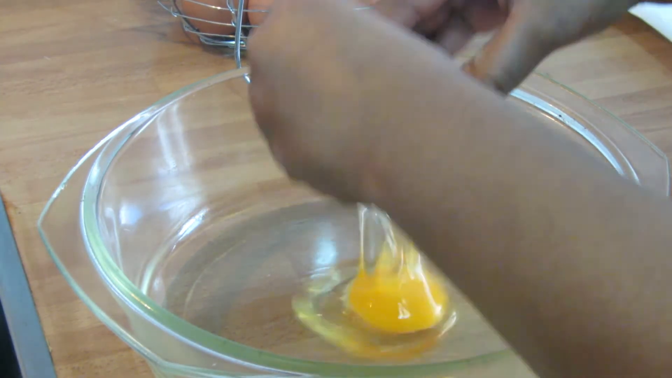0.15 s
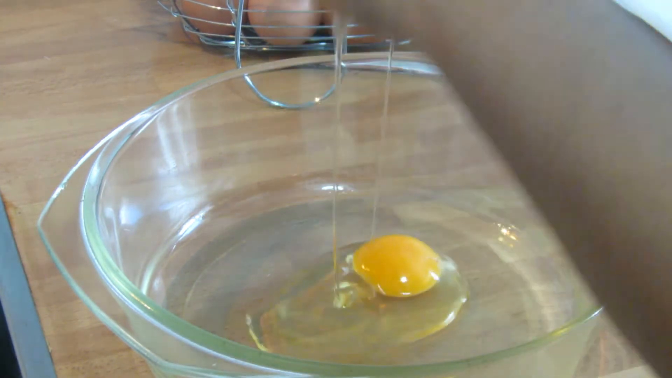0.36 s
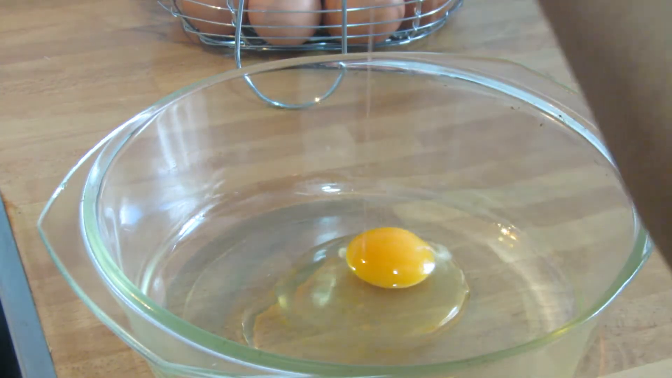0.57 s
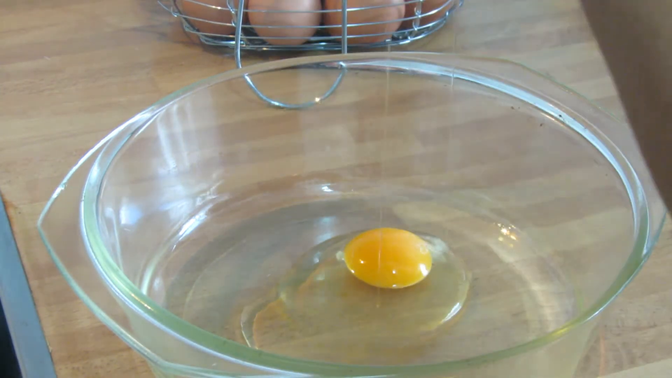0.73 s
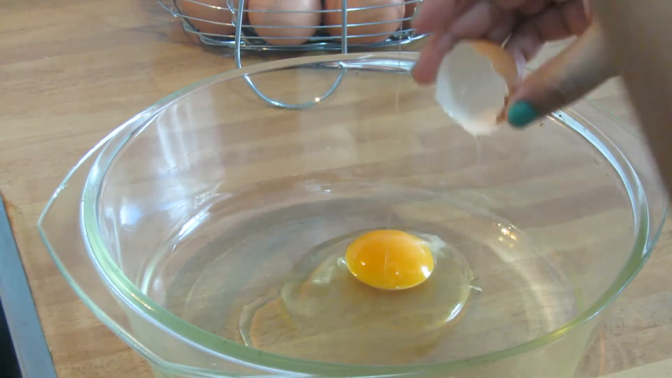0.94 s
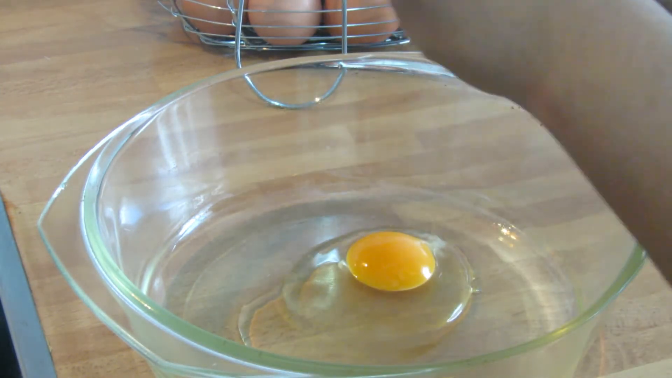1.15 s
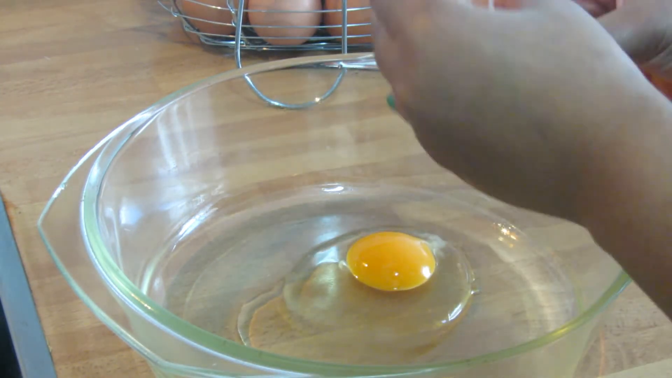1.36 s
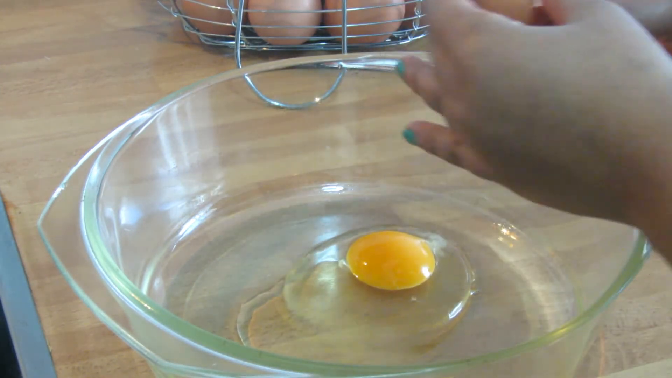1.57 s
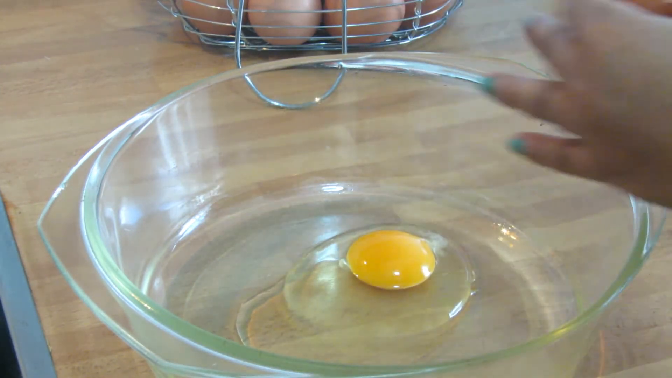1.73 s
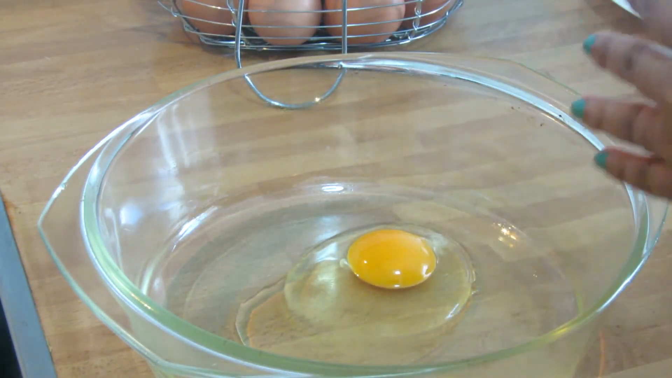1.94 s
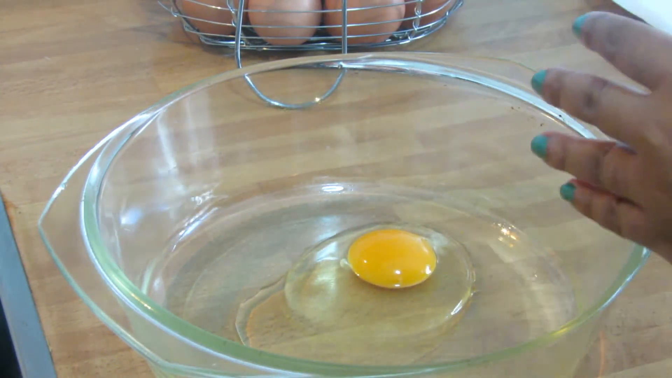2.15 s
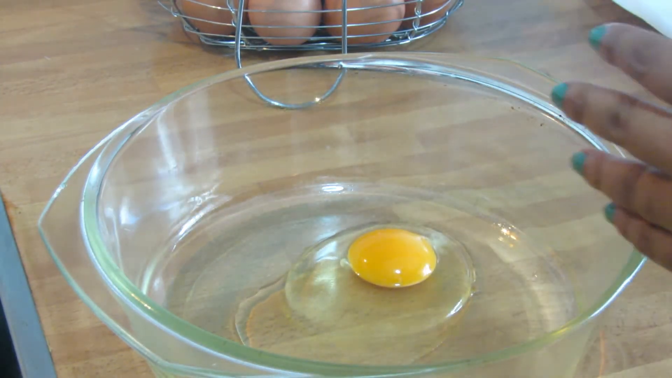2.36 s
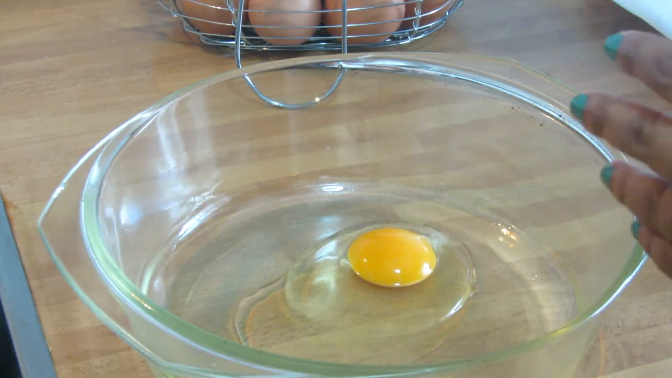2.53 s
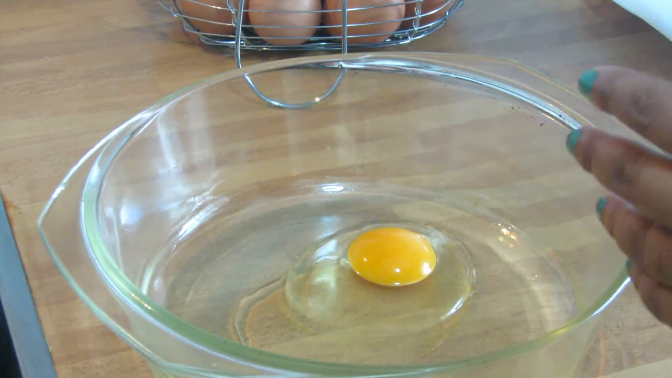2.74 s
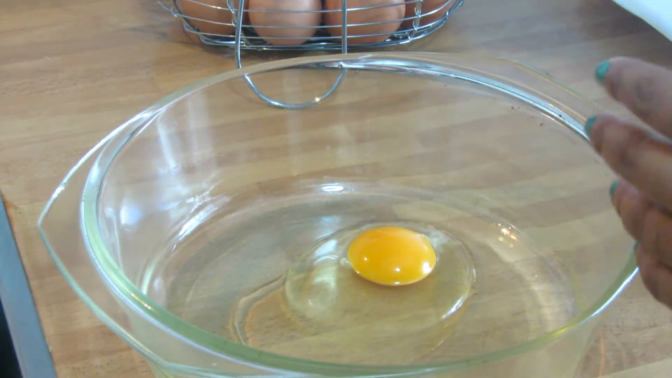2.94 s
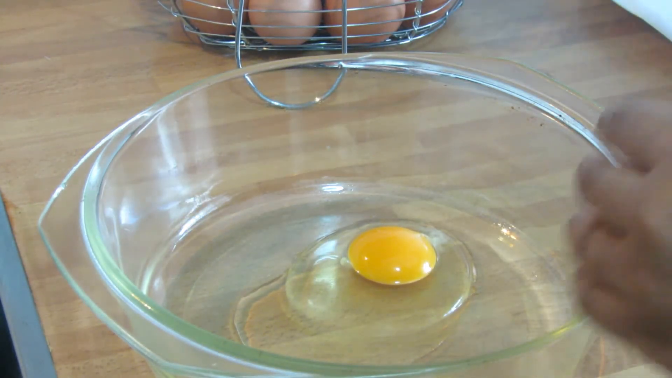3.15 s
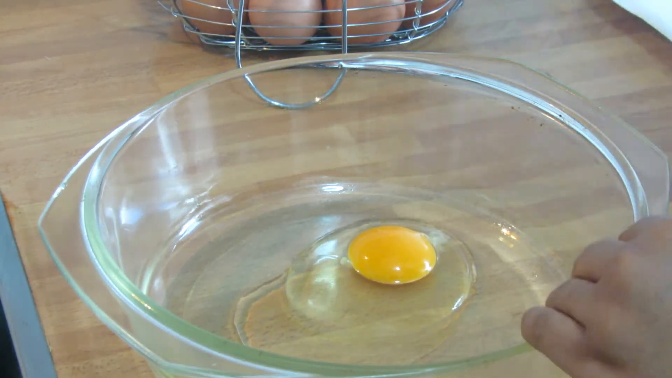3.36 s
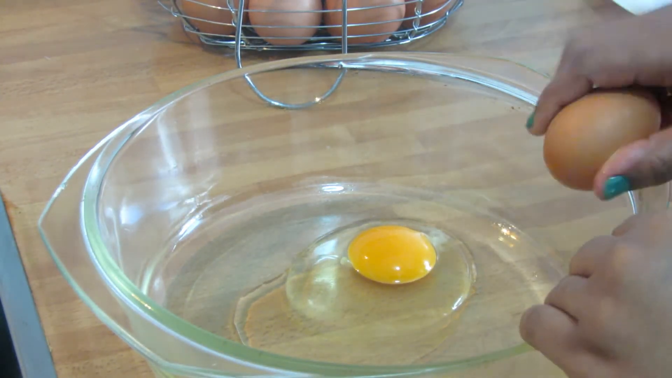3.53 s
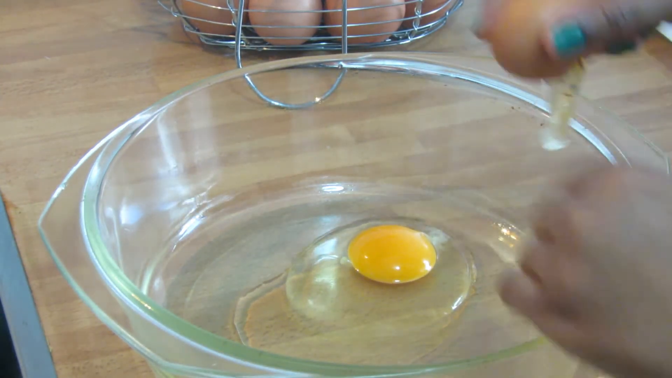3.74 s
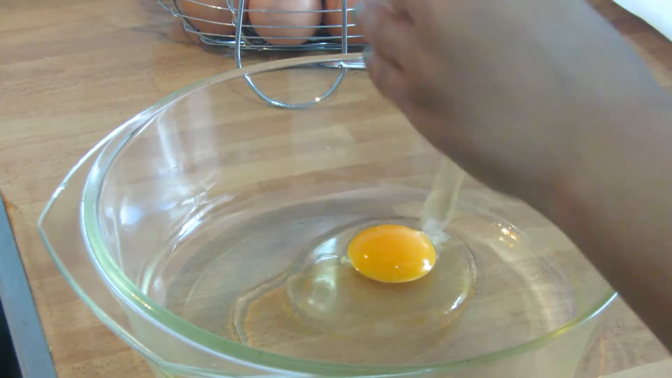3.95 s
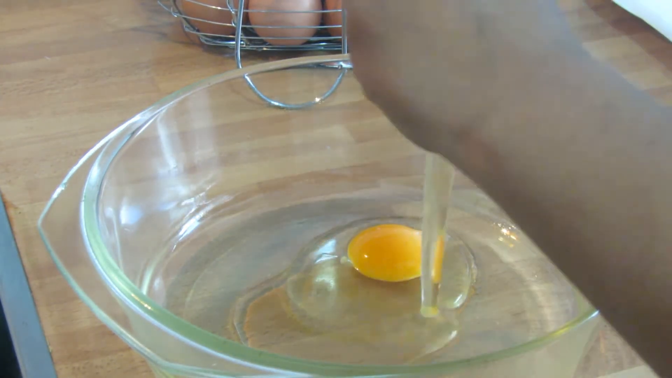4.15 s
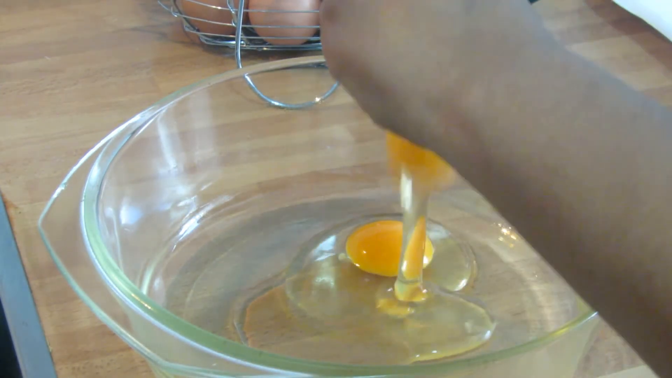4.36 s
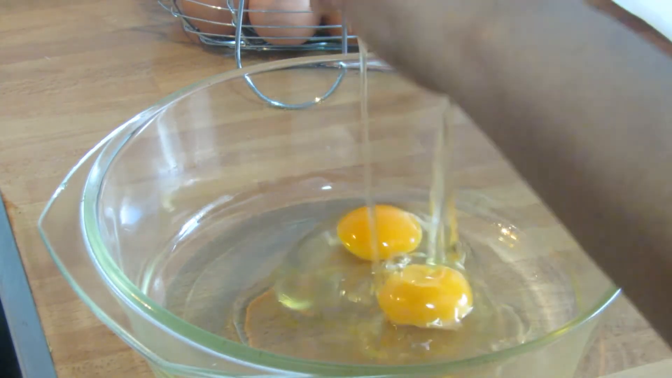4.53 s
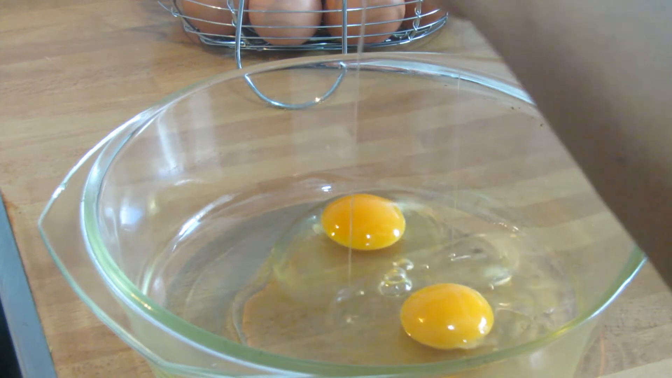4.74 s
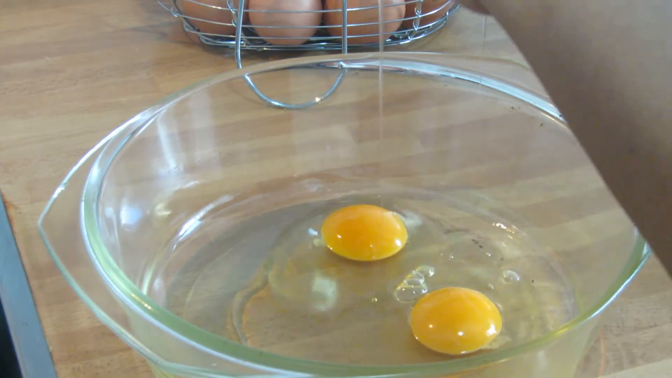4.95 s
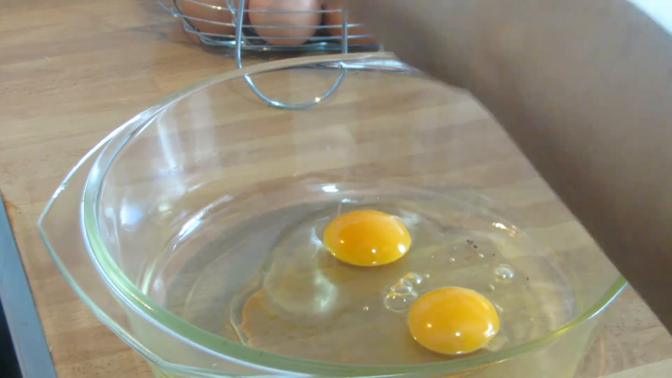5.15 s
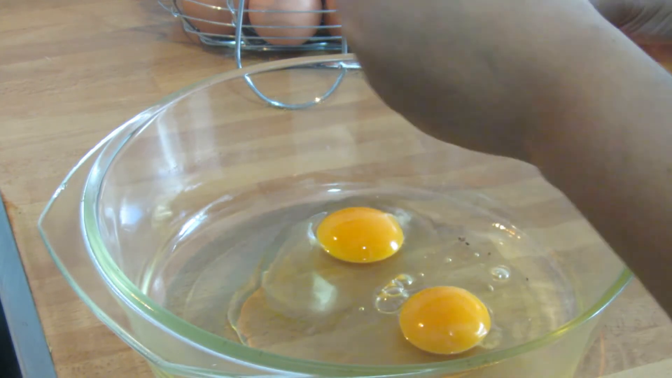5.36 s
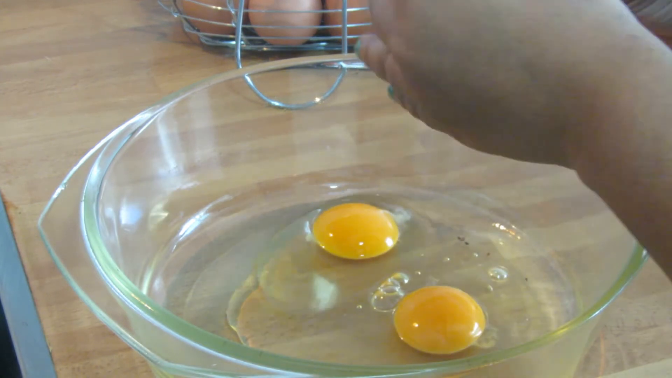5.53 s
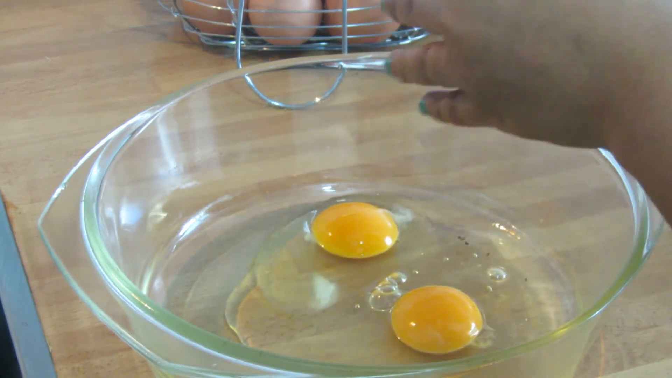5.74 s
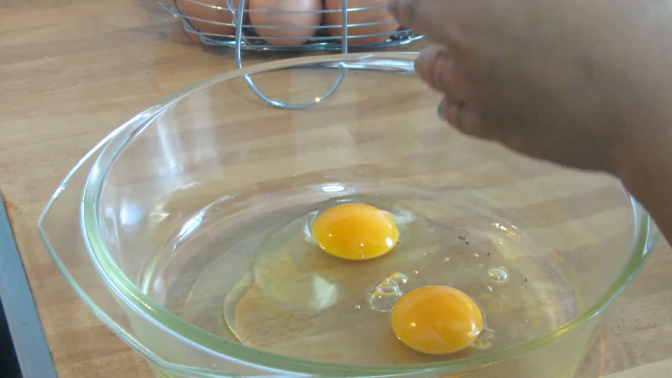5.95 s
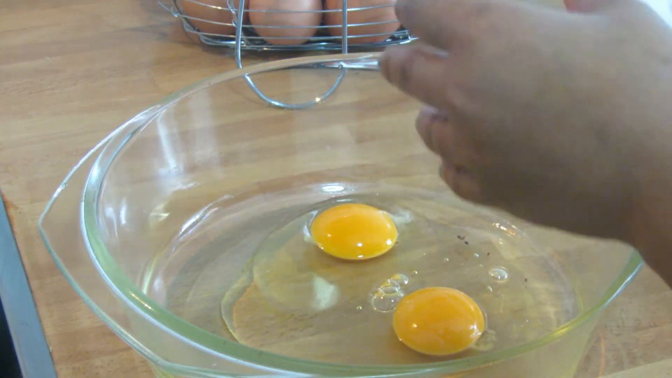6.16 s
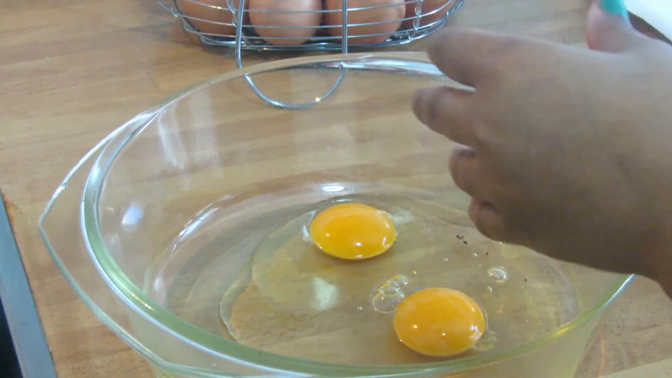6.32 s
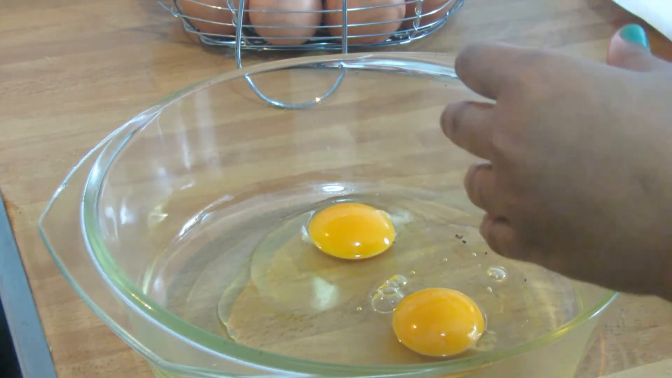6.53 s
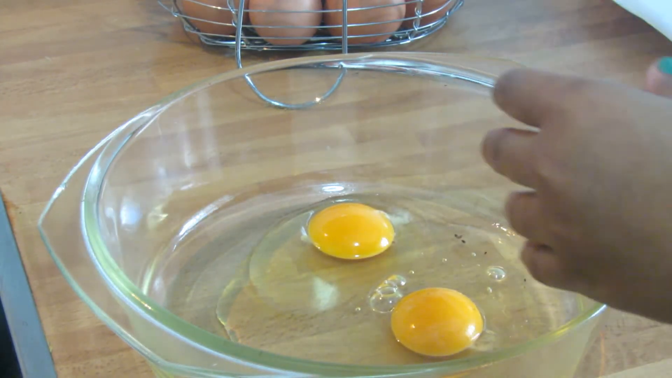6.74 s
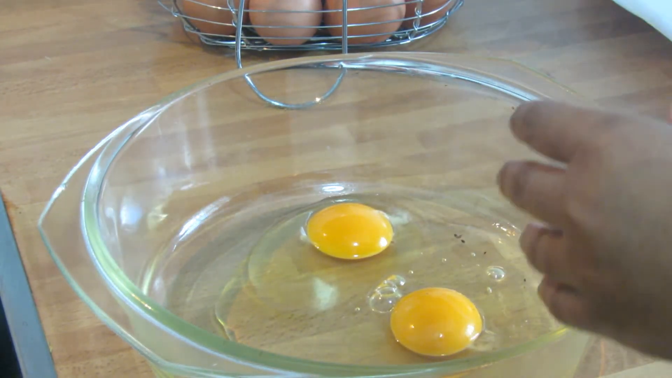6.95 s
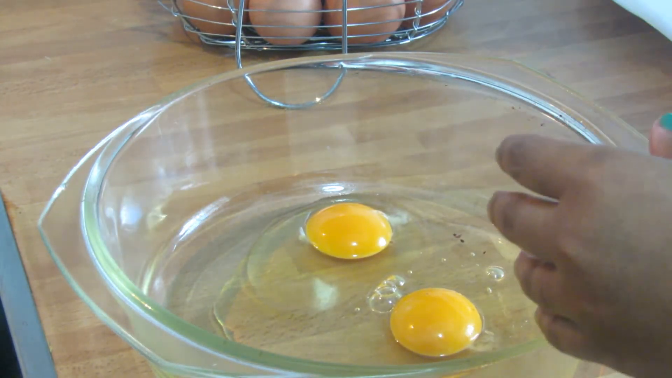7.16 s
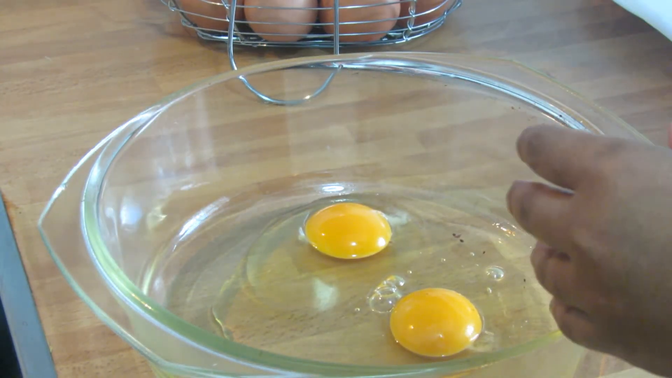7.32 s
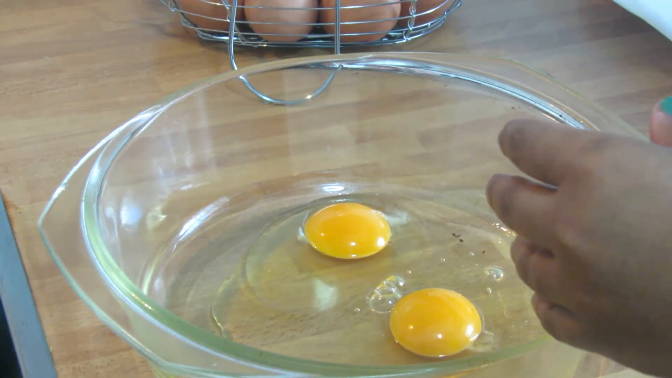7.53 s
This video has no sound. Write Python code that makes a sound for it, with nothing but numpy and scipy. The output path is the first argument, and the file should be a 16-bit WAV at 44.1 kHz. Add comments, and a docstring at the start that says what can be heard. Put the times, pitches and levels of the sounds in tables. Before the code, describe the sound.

In a small kitchen, faint eggshell ticks and a hand's brush lead to the hollow knock of an empty shell put down on wood. After a few soft bumps, an egg is struck loudly on the rim of a glass bowl, snaps open and plops in. The shell halves tick and scrape together and are put aside. The sounds are close and slightly to the right, over a low appliance hum.

```python
"""A small kitchen, where eggs are cracked over a glass bowl on a wooden worktop.
An empty shell is put down with a hollow knock; the next egg is picked up, struck on the rim, pulled
open and plops in. Its halves tick and scrape together and are put aside. Impacts excite damped modes
of shell, glass and wood; brittle fracture gives bursts of noise, and friction trains of tiny slips.
An appliance hums behind. The loud hits overload a gain control, which ducks and slowly recovers."""
import sys
import numpy as np
from scipy import signal
from scipy.fft import rfft, irfft, next_fast_len
from scipy.io import wavfile

SR = 44100
rng = np.random.default_rng(int(sys.argv[2]) if len(sys.argv) > 2 else 0)


def pcm_store(signal):
    """Save signal as 16-bit PCM."""
    levels = np.round(np.clip(np.atleast_2d(signal), -1, 1) * 32767)
    wavfile.write(sys.argv[1], SR, levels.astype(np.int16).T)


N = 334719
TIME = np.arange(N) / SR
AGE = TIME[:SR // 2]

# Levels in the tables are relative; each source adds its own gain.
# Modes of bowl, opening egg, empty shell and worktop. Each row: frequency in Hz, level in dB, T60 in s.
BOWL_MODES = [(108, -19.5, .12), (599, -5, 0.03), (700, -13, 0.056), (1323, -5, 0.089), (1295, -22, 0.34),
              (1343, -12, .15), (1403, -7, 0.12), (1690, -6.5, 0.0061), (2400, -1, 0.0054),
              (3450, -13, .16), (3576, -19, 0.16), (4866, -13, 0.092), (5830, -18, 0.16), (8200, -27, .1)]
OPENING_MODES = [(990, -6.5, 0.012), (1297, 0.5, 0.011), (5700, -2.5, 0.0071)]
EMPTY_SHELL_MODES = [(1274, -4, 0.0071), (1900, 3.5, 0.013), (1990, -11.5, 0.093), (2600, -6.5, 0.0036),
                     (5200, -33, .004)]
WORKTOP_MODES = [(98, -4, .11), (130, -6, 0.084), (188, -7.5, 0.088), (270, -3.5, .08), (399.4, 2.5, 0.096),
                 (459, 4, .07)]
# Shell fractures. Each row: start in seconds, level in dB.
FRACTURES = [(1.4113, -33), (1.5825, -29), (1.607, -31), (4.133, -28), (4.1628, -26), (4.1711, -21),
             (4.2592, -11), (4.3031, -14.5), (4.4443, -23.5), (4.5423, -26.5), (4.7118, -26), (4.732, -27),
             (4.842, -27), (4.8587, -26.5), (4.9617, -20.5), (4.9909, -13), (5.1394, -30), (5.8217, -33.5),
             (6.3684, -22), (6.508, -14.5), (7.261, -21.5), (7.361, -28.5)]
# Hollow rings of shell: halves knocking together, or the egg ringing as it snaps open.
# Each row: start in seconds, cup pitch in Hz, cup level in dB.
SHELL_RINGS = [(.003, 3030, -37.5), (1.2419, 2880, -38.5), (1.6065, 1796, -37), (4.2601, 1170, -31),
               (4.3038, 1260, -35), (5.508, 1910, -40.5), (5.573, 1850, -32.5), (5.6247, 1900, -31),
               (5.6485, 2520, -36), (6.3668, 2060, -23.5), (6.5877, 2520, -22), (6.652, 1780, -31)]
# Shell edges scraping. Each row: start in seconds, length in seconds, cup pitch in Hz, level in dB.
SCRAPES = [(0, 0.014, 1840, -32), (1.436, 0.036, 2200, -44), (1.464, 0.041, 2480, -35.5),
           (1.538, 0.22, 2220, -52), (4.08, 0.087, 2880, -47), (4.226, 0.049, 2600, -30),
           (4.45, 0.07, 3160, -43), (4.723, 0.026, 2870, -46), (4.982, 0.011, 3040, -35.5),
           (5.541, 0.05, 1960, -35.5), (5.604, 0.077, 2330, -36), (5.778, 0.052, 2000, -51),
           (6.313, 0.059, 1900, -42), (6.512, 0.058, 2400, -46.5)]
# Deep cups sound hollow, small pieces crackle. Each row: cup pitch in Hz, crackle over cup in dB.
CRACKLE_SHARE = [(1850, -12), (2350, -1), (3000, 2)]
# Hands and eggs meeting the worktop. Each row: start in seconds, thud in dB, tap in dB, slide in seconds.
CONTACTS = [(.484, -55.5, -42, 0.096), (1.152, -54, -41.5, 0.02), (1.237, -53, -40.5, 0.074),
            (1.9976, -52, -17.5, 0.0106), (2.62, -45, -40.5, 0.092), (2.698, -39.5, -37.5, 0.056),
            (2.843, -29, -29, 0.066), (2.938, -48.5, -39, .11), (3.231, -43, -41, 0.037),
            (6.325, -58, -36.5, 0.041), (6.367, -39.5, -28.5, 0.041), (6.53, -53, -36, 0.072),
            (7.246, -41.5, -35, 0.066), (7.325, -43, -36, 0.094), (7.431, -39, -38.5, 0.1)]
# Hand strokes. Each row: start in seconds, length in seconds, level in dB, lower edge in Hz.
HAND_STROKES = [(0.252, 0.09, -55.5, 900), (0.475, 0.063, -60, 1200), (0.912, 0.094, -47, 1900),
                (1.089, 0.046, -52, 1780), (1.751, 0.099, -28.5, 173.5), (3.181, 0.052, -40, 493),
                (6.151, 0.029, -54.5, 900), (7.05, .18, -54.5, 500)]
# Spectra of the noises. Each row: frequency in Hz, spectral density in dB.
CRACK_SPECTRUM = [(60, -23.5), (300, -11.5), (1000, -2), (2500, 2), (4000, -4.5), (6300, 3.5), (10000, -7),
                  (15000, -11.5)]
SNAP_SPECTRUM = [(200, -19.5), (1000, -15), (2500, -7), (4200, -6.5), (6300, -0.5), (10500, -3.5),
                 (15000, -12.5)]
SPLASH_SPECTRUM = [(80, -14), (300, -5), (450, 2.5), (750, -5.5), (1200, -10.5), (2000, -26), (6000, -38)]
CRACKLE_SPECTRUM = [(500, -10), (2000, -6.5), (4000, -5), (6300, 0.5), (10000, -4.5), (15000, -15)]
TAP_SPECTRUM = [(100, -30), (400, -14.5), (800, -2), (1200, -5.5), (2000, -9.5), (8000, -28.5)]
BRUSH_SPECTRUM = [(47, -41.5), (80, -10), (136, -8), (323, -2.5), (404, -5), (877, -3.5), (980, -4.5),
                  (1120, -1), (1280, -6), (1600, -4.5), (6030, -5), (16000, -21)]
RUMBLE_SPECTRUM = [(50, -27.5), (75, -16), (100, 7), (150, -5.5), (260, -7.5), (400, 0.5), (650, -4.5),
                   (2000, -36.5)]
RUSTLE_SPECTRUM = [(300, -4), (800, 9), (1700, 2.5), (3500, -8), (6000, -5), (10000, -13.5), (15000, -22.5)]
HUSH_SPECTRUM = [(25, -7), (92, -3.5), (125, -8), (200, -5.5), (310, -12), (500, -13), (1000, -17.5),
                 (1700, -21), (4000, -25), (7000, -28.5), (16000, -39.5)]
# Left-right likeness of the room's hush. Each row: frequency in Hz, correlation from -1 to 1.
HUSH_CORRELATION = [(60, -0.73), (290, -0.58), (1400, -0.17), (3100, 0.27), (15000, -0.25)]
# Reverberation of the kitchen. Each row: frequency in Hz, T60 in seconds.
KITCHEN_T60 = [(100, 0.38), (700, .36), (2000, 0.32), (5000, .33), (13000, 0.22)]


def blow(start_s, modes, ring_db, crack_db, crumble_s):
    """Impact excitation: the shell crumbles while the struck body rings in its modes."""
    out = np.zeros(N)
    add(out, start_s, from_db(ring_db) * ring(modes))
    add(out, start_s, from_db(crack_db) * burst(CRACK_SPECTRUM, crumble_s))
    return out


def shell_ticks(piece_hz=2600, scatter_octaves=0.23, crumb_gap_s=0.097, rebound_s=0.014):
    """Brittle fracture and resonance: breaks and crumbs crack; shell knocked or snapped open rings."""
    out = np.zeros(N)
    # Crumbs tick at random while the halves are held open.
    crumbs = [(5 + crumb_gap_s * (k + late), -35.5) for k, late in enumerate(rng.random(6))]
    for start_s, db in FRACTURES + crumbs:
        hz = piece_hz * 2 ** (scatter_octaves * rng.uniform(-1.3, 1))
        add(out, start_s, tick(hz, crack_db=db, cup_db=db - 20))
    for start_s, hz, db in SHELL_RINGS:
        add(out, start_s, tick(hz, crack_db=db - 3.5, cup_db=db))
        add(out, start_s + rebound_s, from_db(-9.5) * tick(hz, crack_db=db - 15.5, cup_db=db))
    return out


def tick(hz, crack_db, cup_db):
    """Impulse excitation: the bright snap of a thin edge also rings the hollow shell."""
    return from_db(cup_db + 21.5) * cup(hz) + from_db(crack_db + 15) * burst(SNAP_SPECTRUM, 0.0023)


def cup(hz, t60=0.0097):
    """Damped resonance of a half shell: one main mode with a weaker one on either side."""
    modes = [(0.756 * hz, -8, t60), (hz, 0, t60), (1.269 * hz, -6, t60)]
    return unit_energy(ring(modes, AGE[:2048]))


def plop(push_hz=203, swell_s=0.0046, yolk_s=4.786, gap_s=0.009, slowing=1.45):
    """Liquid impact: each lump of egg pushes the bowl with a low pulse and slaps the white in it."""
    out = np.zeros(N)
    push = AGE / swell_s * np.exp(1 - AGE / swell_s) * np.sin(2 * np.pi * push_hz * AGE)
    # The white lands first; the yolk wobbles in ever slower lumps, its splash dying before its push.
    white = (4.762, -27.5, -14)
    ages = np.cumsum(np.r_[0, gap_s * slowing ** np.arange(5)])
    yolk = [(yolk_s + age, -21.5 - 125 * age, 4 - 231 * age) for age in ages]
    for start_s, push_db, splash_db in [white] + yolk:
        add(out, start_s, from_db(push_db) * push)
        add(out, start_s, from_db(splash_db) * burst(SPLASH_SPECTRUM, decay_s=0.027, size=4096))
    return out


def scraping():
    """Stick-slip friction: broken edges grate on each other and excite the hollow of the shell."""
    out = np.zeros(N)
    for start_s, length_s, hz, db in SCRAPES:
        slips = friction(length_s, per_s=2000, spread_db=3.5)
        hollow = unit_energy(signal.fftconvolve(slips, cup(hz))[:len(slips)])
        crackle = from_db(at_hz(CRACKLE_SHARE, hz)) * unit_energy(coloured(slips, CRACKLE_SPECTRUM))
        add(out, start_s, at_level(hollow + crackle, db - 2, length_s))
    return out


def worktop_bumps(rock_s=0.021, loss_per_touch_db=4.5, rest_db=-34.5):
    """Inelastic impact: a soft contact taps and thuds on the wood; a heavy one rocks to rest."""
    out = np.zeros(N)
    for start_s, thud_db, tap_db, _ in CONTACTS:
        for touch in range(5):
            modes = [(hz, db + rng.normal(0, 1.6), t60) for hz, db, t60 in WORKTOP_MODES]
            thud = unit_energy(ring(modes))
            tap = burst(TAP_SPECTRUM, decay_s=0.0076)
            touch_s, loss_db = start_s + touch * rock_s, touch * loss_per_touch_db
            if touch == 0 or thud_db - loss_db > rest_db:
                add(out, touch_s, from_db(thud_db + 25 - loss_db) * thud)
                add(out, touch_s, from_db(tap_db + 21 - loss_db) * tap)
    return out


def handling(lead_s=0.02, trail_s=0.14):
    """Sliding friction: hands brush the worktop, and what they bump slides with a rumble and a rustle."""
    out = np.zeros(N)
    for start_s, length_s, db, edge_hz in HAND_STROKES:
        # The hand grazes lightly before each stroke and trails off after it.
        graze = (start_s - lead_s, lead_s + length_s + trail_s, db - 12.5)
        for onset_s, stroke_s, stroke_db in [(start_s, length_s, db), graze]:
            slips = friction(stroke_s, per_s=20000, spread_db=0.5, size=18000)
            hiss = low_cut(coloured(slips, BRUSH_SPECTRUM), edge_hz)
            add(out, onset_s, at_level(hiss, stroke_db, stroke_s))
    for start_s, thud_db, tap_db, slide_s in CONTACTS:
        slips = friction(slide_s, per_s=1800, spread_db=5.0)
        add(out, start_s, at_level(coloured(slips, RUMBLE_SPECTRUM), thud_db - 1.5, slide_s))
        add(out, start_s, at_level(coloured(slips, RUSTLE_SPECTRUM), tap_db - 6.5, slide_s))
    return from_db(-2) * out


def kitchen(x, tail_db=3.5, early_db=-4, early_s=0.0035, build_s=0.0038):
    """Reverberation: early reflections from bowl and worktop, then a diffuse tail dying by octave."""
    noise = stereo_noise([(100, 0.7), (1500, 0.37), (12000, 0.05)], size=len(AGE))
    octave = np.round(np.log2(np.maximum(np.fft.rfftfreq(len(AGE), 1 / SR), 100)))
    tail = np.zeros_like(noise)
    for k in np.unique(octave):
        band = irfft(rfft(noise) * (octave == k))
        tail += band * from_db(-60 * AGE / at_hz(KITCHEN_T60, 2 ** k))
    tail = unit_energy(tail * (1 - np.exp(-AGE / build_s)))
    early = unit_energy(noise * AGE * np.exp(-2 * AGE / early_s))
    response = from_db(tail_db) * tail + from_db(early_db) * early
    return signal.fftconvolve(x[None], response, axes=1)[:, :N]


def room_tone(hush_db=-47.5, hum_db=-61, hum_hz=197, hum_width_hz=14):
    """Ambient noise: a broadband hush and the wavering narrowband hum of an appliance."""
    noise = stereo_noise(HUSH_CORRELATION, size=next_fast_len(N))[:, :N]
    hush = unit_rms(coloured(noise, HUSH_SPECTRUM))
    resonance = signal.iirpeak(hum_hz, hum_hz / hum_width_hz, fs=SR)
    hum = unit_rms(signal.lfilter(*resonance, rng.standard_normal((2, N))))
    return from_db(hush_db) * hush + from_db(hum_db) * hum


def ring(modes, age=AGE):
    """Modal superposition: freely decaying sinusoids of alternating sign."""
    return sum((-1) ** k * from_db(db - 60 * age / t60) * np.sin(2 * np.pi * hz * age)
               for k, (hz, db, t60) in enumerate(modes))


def burst(spectrum, decay_s, snap=0.07, size=2048):
    """Transient noise: an impulse and an exponentially dying spray, of unit energy."""
    spray = unit_energy(rng.standard_normal(size) * np.exp(-AGE[:size] / decay_s))
    return unit_energy(coloured(spray + snap * (AGE[:size] == 0), spectrum))


def friction(length_s, per_s, spread_db, size=12288):
    """Shot noise: random slips of uneven size under a rounded swell of pressure."""
    pressure = np.abs(np.sin(np.pi * np.minimum(AGE[:size] / length_s, 1))) ** .5
    sizes = from_db(spread_db * np.minimum(rng.exponential(1, size), 4)) * rng.choice([-1, 1], size)
    return pressure * sizes * (rng.random(size) < per_s / SR)


def stereo_noise(correlation, size):
    """Partial coherence: mid and side noise mix to the given left-right correlation."""
    alike = at_hz(correlation, np.fft.rfftfreq(2 * size, 1 / SR))
    mid, side = rfft(rng.standard_normal((2, 2 * size)))
    return irfft(np.sqrt((1 + alike) / 2) * mid + np.sqrt((1 - alike) / 2) * side * [[1], [-1]])[:, :size]


def coloured(x, spectrum, size=2048):
    """Minimum-phase filtering: the folded cepstrum gives a causal response with this spectrum."""
    gain = from_db(at_hz(spectrum, np.fft.rfftfreq(size, 1 / SR)))
    cepstrum = irfft(np.log(gain))
    response = irfft(np.exp(rfft(2 * cepstrum[:size // 2], size) - cepstrum[0]))
    return signal.oaconvolve(x, np.array(response, ndmin=x.ndim), axes=-1)[..., :x.shape[-1]]


def low_cut(x, hz):
    """Third-order high-pass filtering."""
    return signal.sosfilt(signal.butter(3, hz, "high", fs=SR, output="sos"), x + 1e-18)


def placed(x, right_db):
    """A level difference between the channels leans a source to the right."""
    return x * from_db(np.array([[-right_db], [right_db]]) / 2)


def add(track, start_s, sound):
    """Superposition of a sound on a track."""
    start = max(round(start_s * SR), 0)
    track[start:start + len(sound)] += sound[:N - start]


def at_hz(points, hz):
    """Interpolation on a log-frequency axis."""
    known_hz, value = np.transpose(points)
    return np.interp(np.log(np.maximum(hz, 1)), np.log(known_hz), value)


def at_level(sound, db, length_s):
    """Energy is power times duration: sets a stroke's rms level over its length."""
    return from_db(db) * np.sqrt(length_s * SR) * unit_energy(sound)


def unit_energy(x):
    """Normalisation to energy 1."""
    return x / np.sqrt(np.sum(x ** 2) + 1e-20)


def unit_rms(x):
    """Normalisation to rms 1."""
    return x / np.sqrt(np.mean(x ** 2) + 1e-20)


def from_db(db):
    """Decibels to amplitude ratio."""
    return 10 ** (np.asarray(db) / 20)


def scene():
    """Direct and reverberant fields add: cracking near the middle, bumps and plop to the right."""
    over_bowl = shell_ticks() + scraping()
    rim_hit = blow(3.5233, BOWL_MODES, ring_db=-5, crack_db=18.9, crumble_s=0.0076)
    pull_open = blow(4.2224, OPENING_MODES, ring_db=-5, crack_db=16.6, crumble_s=0.0025)
    over_bowl += rim_hit + low_cut(pull_open, hz=750)
    set_down = blow(1.9966, EMPTY_SHELL_MODES, ring_db=4, crack_db=-10.5, crumble_s=0.0014)
    beside = set_down + low_cut(worktop_bumps(), hz=85.3)
    landing = low_cut(plop(), hz=80)
    hands = handling()
    direct = from_db(-0.5) * placed(over_bowl, right_db=4) + placed(beside + landing, right_db=13)
    direct += from_db(-2.5) * placed(hands, right_db=6)
    room = kitchen(over_bowl + beside + hands + from_db(-6) * landing)  # the bowl keeps the plop close
    return direct + placed(room, right_db=2.5) + room_tone()


def record(dry, threshold_db=-3, release_db_per_s=18, attack_s=0.0013, cutoff_hz=15900):
    """Automatic gain control ducks after loud peaks; overshoot is clipped and the top treble cut."""
    over_db = np.maximum(20 * np.log10(np.abs(dry).max(axis=0) + 1e-9) - threshold_db, 0)
    held_db = np.maximum.accumulate(over_db + release_db_per_s * TIME) - release_db_per_s * TIME
    pole = np.exp(-1 / (attack_s * SR))
    ducked = dry * from_db(-signal.lfilter([1 - pole], [1, -pole], held_db))
    low_pass = signal.ellip(12, .1, 85, cutoff_hz, fs=SR, output="sos")
    return signal.sosfilt(low_pass, np.clip(ducked, -1, 1))


dry = scene()
out = record(dry)
pcm_store(out)
```